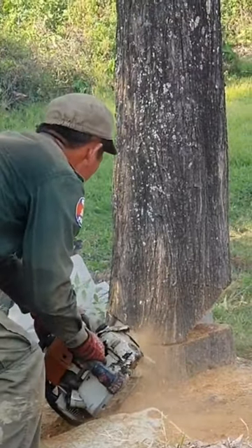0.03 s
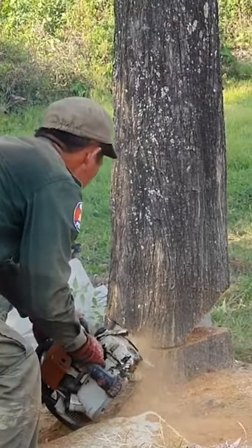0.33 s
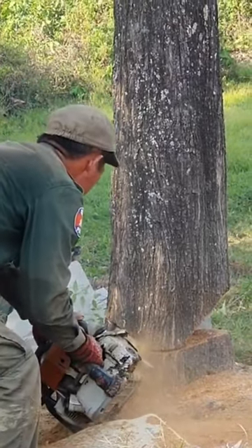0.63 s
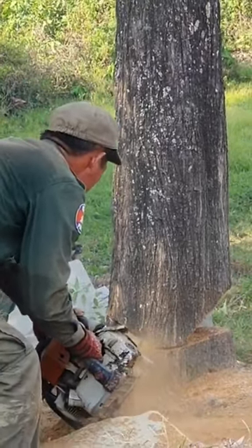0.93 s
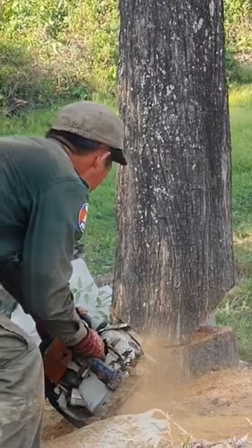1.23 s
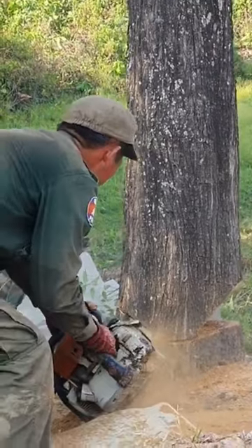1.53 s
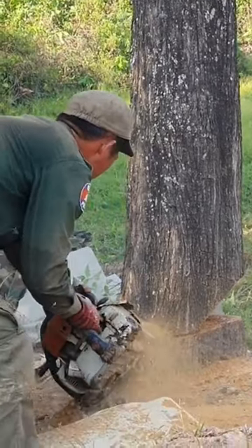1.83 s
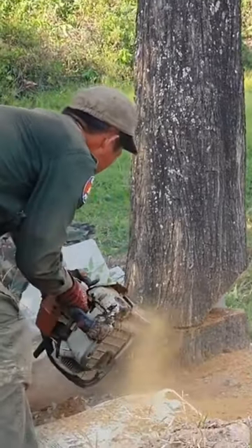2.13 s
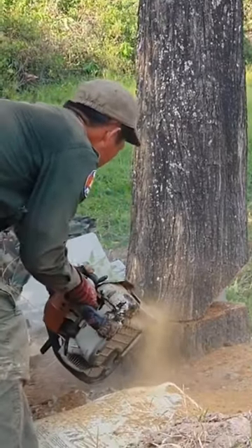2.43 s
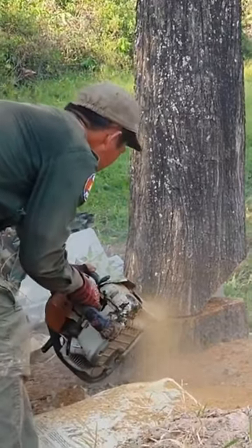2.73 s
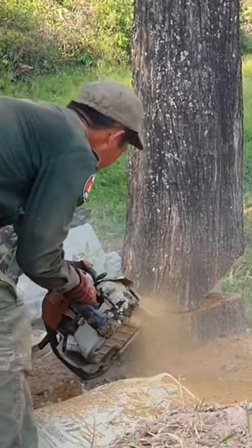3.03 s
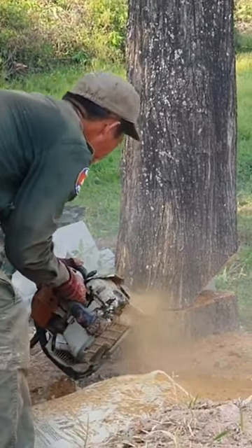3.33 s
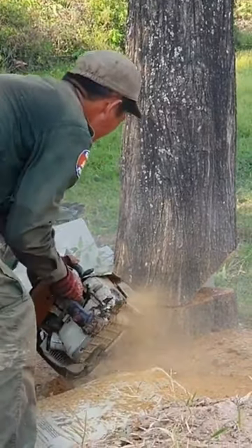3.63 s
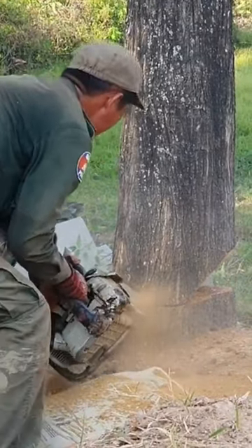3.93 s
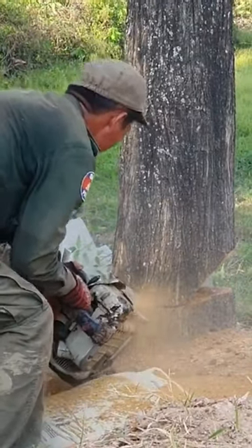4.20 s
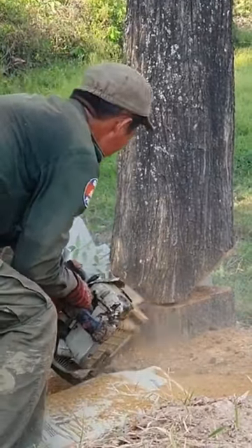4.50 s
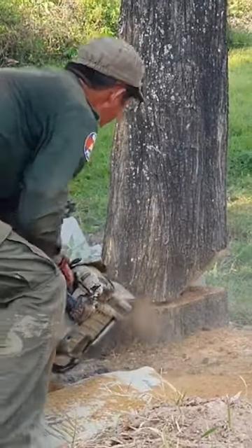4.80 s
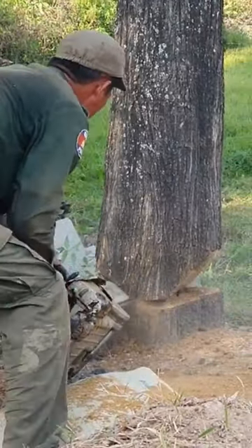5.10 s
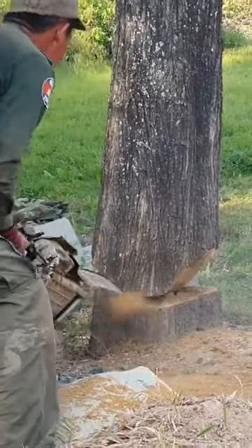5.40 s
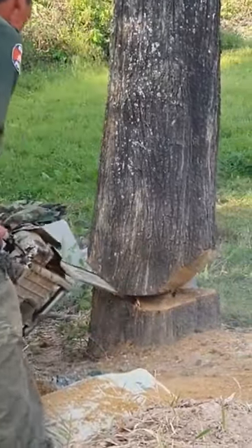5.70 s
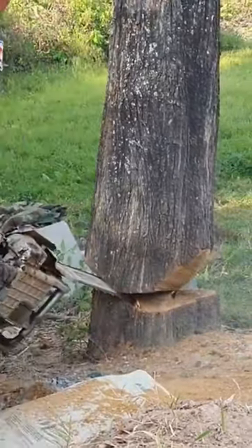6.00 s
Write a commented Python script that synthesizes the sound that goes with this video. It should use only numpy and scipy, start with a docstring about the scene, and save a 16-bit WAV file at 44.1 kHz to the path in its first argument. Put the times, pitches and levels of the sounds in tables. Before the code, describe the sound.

A chainsaw roars steadily under load in a tree trunk, its engine mixed with rasping wood and a metallic whine. It sputters and sags twice, recovering each time, then revs up briefly and winds down. A short scrape follows as the blade leaves the wood, and the saw ticks and rattles at idle. It is heard from a few steps away, stronger on the right, with a faint echo from surrounding trees.

```python
"""Outdoors among trees, a few steps away, a two-stroke chainsaw cuts through a trunk.
Each turn of the engine sends a puff through the muffler; the puffs merge into a snarl and ring the steel,
while the chain hisses and tears out chips. Twice the engine stumbles and picks up again as the saw is
shifted in the cut. Then the throttle closes, the bar (the blade that carries the chain) scrapes out of
the cut and the engine runs down to a puttering idle with a jingling chain."""
import sys
import numpy as np
from scipy import signal
from scipy.fft import rfft, irfft, next_fast_len
from scipy.io import wavfile
from scipy.ndimage import uniform_filter1d, map_coordinates

SR = 44100
rng = np.random.default_rng(int(sys.argv[2]) if len(sys.argv) > 2 else 0)


def transcribe(u):
    """Save the signal u as a 16-bit wav file named by the first command-line argument.

    u: samples, shape (n,) or (channels, n), limited to [-1, 1]; the rate is SR.
    q: integer samples, one column per channel.
    """
    v = np.clip(np.atleast_2d(u).T, -1, 1)
    q = np.round(v * 32767).astype(np.int16)
    wavfile.write(sys.argv[1], SR, q)


N = 271215
TIME_S = np.arange(N) / SR
TUNED_HZ = 128.6  # the engine speed at which the muffler booms loudest under load
BRAKE_AT_S, BRAKE_S = 5.49, .035  # the bar drags out of the cut and brakes the engine
SCRAPE_AT_S, SCRAPE_S, SCRAPE_DB = 5.522, 0.081, 8.3  # the scrape it makes on the way out


def amp(db):
    """Turn decibels into a number to multiply by."""
    return 10 ** (np.asarray(db) / 20)


def unit(x):
    """Scale a sound to an average (rms) level of 1."""
    return x / np.sqrt(np.mean(x ** 2) + 1e-20)


def steady(x, size=3500):
    """Hold the running level near 1; single beats keep their shape."""
    power = uniform_filter1d(uniform_filter1d(x ** 2, size), size // 2)
    return x / np.sqrt(np.abs(power) + 1e-6 * np.mean(x ** 2))


def along(points, hz):
    """Read values between (pitch_hz, value) points, on a log pitch scale."""
    pitches, values = np.transpose(points)
    return np.interp(np.log(hz + 1), np.log(pitches + 1), values)


def curve(points):
    """Join (time_s, value) points with straight lines."""
    return np.interp(TIME_S, *np.transpose(points))


def blend(a, b, share):
    """Fade from a to b as share goes from 0 to 1."""
    return a + (b - a) * np.clip(share, 0, 1)


def after(middle_s, length_s):
    """A ramp from 0 to 1, halfway up at middle_s."""
    return np.clip((TIME_S - middle_s) / length_s + .5, 0, 1)


def since(start_s):
    """Seconds gone by since start_s; zero before it."""
    return np.maximum(TIME_S - start_s, 0)


def swell(middle_s, length_s, height):
    """A smooth bump that stays above half its height for length_s."""
    return height * np.exp(-np.log(2) * np.minimum((2 * (TIME_S - middle_s) / length_s) ** 2, 20))


def swells(rows):
    """Add up one bump for each row."""
    return sum(swell(*row) for row in rows)


def wobble(rate):
    """A smooth curve through rate random values a second."""
    knots = rng.standard_normal(int(N * rate / SR) + 4)
    fine = np.arange(0, len(knots) - 1, 1 / 8)
    return np.interp(np.arange(N) * rate / SR, fine, map_coordinates(knots, [fine]))


def hiss():
    """Two unrelated noises: one for the direct path, one for the scattered paths."""
    return rng.standard_normal((2, N))


def pulses(at, sizes):
    """Clicks at positions counted in samples, even between two samples."""
    index = np.floor(at).astype(int)[:, None] + np.arange(-7, 9)
    offset = index - at[:, None]
    shape = np.sinc(offset) * np.cos(np.pi * offset / 16) ** 2
    return np.bincount(np.clip(index, 0, N).ravel(), (sizes[:, None] * shape).ravel(), N + 1)[:N]


def strikes(rows):
    """One click for each (start_s, level_db) row."""
    start_s, level_db = np.transpose(rows)
    return pulses(start_s * SR, amp(level_db))


def puffs(clicks, rise_s, fall_s):
    """Each click becomes a quick swell of about its own height that dies away."""
    t = np.arange(SR // 20) / SR
    shape = (1 - np.exp(-t / rise_s)) * np.exp(-t / fall_s)
    return np.abs(signal.oaconvolve(clicks, shape / shape.max())[:N])


def filtered(x, response):
    """Scale and shift each frequency of a sound by response(hz)."""
    size = 2 * next_fast_len((N + SR // 4) // 2)
    return irfft(rfft(x, size) * response(np.fft.rfftfreq(size, 1 / SR)), size)[..., :N]


def coloured(x, spectrum, size=4096):
    """Give a sound the tone colour drawn by (pitch_hz, level_db) points."""
    gains = amp(along(spectrum, np.fft.rfftfreq(size, 1 / SR)))
    cepstrum = irfft(np.log(gains + 1e-6))
    # folding makes the filter ring only after a click, never before it
    cepstrum[1:size // 2] *= 2
    cepstrum[size // 2 + 1:] = 0
    ring = irfft(np.exp(rfft(cepstrum)))
    return signal.oaconvolve(x, np.array(ring, ndmin=x.ndim), axes=-1)[..., :N]


def resonate(x, modes):
    """Ring a set of (pitch_hz, width_hz, level_db) tones; narrow ones ring longer."""
    def response(hz):
        return sum((-1) ** k * amp(db) * 1j * hz * width / (pitch ** 2 - hz ** 2 + 1j * hz * width)
                   for k, (pitch, width, db) in enumerate(modes))
    return filtered(x, response)


def wandering(x, hz, width_hz):
    """Ring one tone whose pitch changes with time."""
    carrier = np.exp(2j * np.pi * np.cumsum(hz) / SR)
    keep = np.exp(-np.pi * width_hz / SR)
    return 2 * np.real(carrier * signal.lfilter([1 - keep], [1, -keep], x * carrier.conj()))


def scattered(x, fade_s):
    """Spread a sound over a short tail of echoes that falls at 60 dB per fade_s."""
    t = np.arange(SR // 4) / SR
    tail = rng.standard_normal(len(t)) * amp(-60 * t / fade_s)
    return signal.oaconvolve(x, tail / np.linalg.norm(tail))[:N]


def tree_echo(saw, level_db=-19):
    """The surrounding trees answer faintly, left and right."""
    return amp(level_db) * np.array([scattered(saw, fade_s=0.42), scattered(saw, fade_s=0.62)])


# How much quieter the shaded left side is: pitch_hz, drop_db
LEFT_SHADE = [(40, 8), (110, 11), (400, 11), (700, 10.5), (1300, 9), (2400, 7), (6000, 6.5), (10000, 4.3),
              (15000, 4.2)]
# How far the wave on the left runs ahead: pitch_hz, lead_radians
LEFT_LEAD = [(30, 0), (130, 1.2), (400, 1.7), (1200, 1.5), (2800, 1.5), (4800, 2.8), (8000, 4.3),
             (15000, 8.3)]
# How much sound reaches the left directly: pitch_hz, share (0 to 1)
LEFT_DIRECT = [(40, .4), (120, .98), (600, .97), (1400, .87), (3000, .68), (5000, .56), (7000, .55),
               (12000, .3)]


def left_and_right(note, noise):
    """The left side is shaded: its sound is weaker and shifted, and its treble is mostly scattered."""
    shade = lambda hz: amp(-along(LEFT_SHADE, hz))
    direct = lambda hz: along(LEFT_DIRECT, hz)
    straight = lambda hz: shade(hz) * direct(hz) * np.exp(1j * along(LEFT_LEAD, hz))
    diffuse = lambda hz: shade(hz) * np.sqrt(1 - direct(hz) ** 2)
    centre = lambda hz: np.hypot(np.abs(1 + straight(hz)), diffuse(hz)) / 2
    sway = 1.1 * wobble(2.5)  # the scattered paths change as the saw moves
    reflected = np.cos(sway) * scattered(note, 0.092) + np.sin(sway) * scattered(note, 0.062)
    paths = np.array([note + noise[0], reflected + noise[1]])
    right, stray = filtered(paths, lambda hz: 1 / centre(hz))
    left = filtered(right, straight) + filtered(stray, diffuse)
    # the shade deepens as the saw is drawn out of the cut
    return np.array([left * amp(-3 * after(5.0, 0.7)), right])


# The throttle closing: time_s, opening (0 to 1)
THROTTLE = [(4.828, 0.9), (4.872, 0.1)]


def throttle():
    """How far open the throttle is at each moment."""
    return curve(THROTTLE)


# The engine's two stumbles: time_s, misfiring (0 to 1)
STUMBLES = [(1.835, 0), (1.85, 0.8), (1.95, 0.4), (1.98, 0.16), (2.13, 0), (2.25, 0), (3.84, 0),
            (3.865, 0.7), (3.91, 0.85), (3.96, 0.04)]


def misfiring():
    """How badly the engine misfires at each moment."""
    return curve(STUMBLES)


# The change from running to idling: time_s, clatter_share (0 to 1)
IDLING = [(4.9, 0), (5.6, 0.92)]


def idle_share():
    """How far the rush of the saw has given way to idle clatter."""
    return curve(IDLING)


# Engine speed until the clutch lets go: time_s, turns_per_s
ENGINE_SPEED = [(0.0, 121.2), (0.12, 122.5), (0.33, 130.5), (0.47, 130.1), (0.7, 125.7), (0.93, 127.8),
                (1.69, 127.5), (1.84, 126.5), (1.96, 109.2), (2.08, 105.3), (2.16, 104.4), (2.4, 123.9),
                (2.8, 127.6), (3.19, 127.4), (3.33, 130.9), (3.82, 134.9), (3.86, 132.0), (3.94, 120.3),
                (4.5, 127.1), (4.76, 144.4), (4.85, 147.8), (4.91, 134.4), (4.976, 126.3), (5.07, 117.9),
                (5.2, 105.8), (5.41, 91.8), (5.46, 88.9)]


def engine_speed(waver=0.002796, braked_share=.59, settle_s=.3, idle_hz=23):
    """Turns per second: wavering as the teeth catch, then braked sharply and settling slowly to idle."""
    braked = braked_share * np.exp(-since(BRAKE_AT_S) / BRAKE_S)
    settling = (1 - braked_share) * np.exp(-since(BRAKE_AT_S) / settle_s)
    running = curve(ENGINE_SPEED) * (1 + waver * wobble(22))
    return blend(idle_hz, running, braked + settling)


def engine_strokes(speed, idle_beat_s=5.9885, misfire_db=15, intake_turn=0.38):
    """One exhaust click and one intake click a turn; a stumbling engine misses every other firing."""
    turns = np.cumsum(speed) / SR
    turns = turns - turns[round(idle_beat_s * SR)]  # one stroke lands on this moment
    beats = np.arange(np.ceil(turns[0]), turns[-1])
    at = np.interp(beats, turns, np.arange(N))
    stumble = misfiring()[at.astype(int)]
    shut = 1 - throttle()[at.astype(int)]
    idling = at > (BRAKE_AT_S + BRAKE_S) * SR
    late, strong, uneven = rng.standard_normal((len(beats), 3)).T
    level_db = -0.7 * strong + 0.5 * shut * uneven
    level_db -= stumble * (2.5 * np.abs(uneven) + misfire_db * (beats % 2))
    jitter_s = .00002 + .00003 * shut + .00016 * stumble + .0006 * idling
    firing = pulses(at + SR * late * jitter_s, amp(level_db))
    intake_at = np.interp(beats[:-1] + intake_turn, turns, np.arange(N))
    return firing, pulses(intake_at, amp(2 * uneven[:-1]))


def intake_gulps(intake, level_db=-43, fade_db_per_s=20, ring_hz=975, glide=0.34, glide_s=0.003):
    """Once the engine is slow, each gulp of air rings a short note that rises as the port closes."""
    t = np.arange(SR // 16) / SR
    cycles = np.cumsum(ring_hz * (1 - glide * np.exp(-t / glide_s))) / SR
    gulp = np.sin(2 * np.pi * cycles) * (1 - np.exp(-t / 0.0036)) * np.exp(-t / 0.0072)
    notes = signal.oaconvolve(intake, gulp)[:N]
    return after(BRAKE_AT_S, 0.06) * amp(level_db - fade_db_per_s * since(BRAKE_AT_S)) * steady(notes)


def intake_hoot(speed, pipe_hz=958, width_hz=70, level_db=-31.5, odd_db=-4, db_per_octave=3):
    """As the engine slows, its overtones swell in turn at the intake's own pitch, the even ones most."""
    turns = np.cumsum(speed) / SR
    note = np.zeros(N)
    for k in range(7, 12):
        off_pitch = 2 * (k * speed - pipe_hz) / width_hz
        note += amp(odd_db * (k % 2)) * np.sin(2 * np.pi * k * turns) / np.hypot(1, off_pitch)
    shut_s = THROTTLE[1][0]
    coasting = after(shut_s, 0.03) * (1 - after(BRAKE_AT_S, 0.06))
    return coasting * amp(level_db + db_per_octave * np.log2(speed / TUNED_HZ) + 1.4 * wobble(30)) * note


# Tone colour of an idle tick: pitch_hz, level_db
TICK_COLOUR = [(1500, -22), (4000, 0), (7000, 1), (8200, -6), (10500, 1), (15000, -7)]


def idle_ticks(firing, level_db=-37, fade_db_per_s=9, from_s=5.64):
    """Each idle stroke spits a short bright tick, softer as the engine settles."""
    force = after(from_s, 0.06) * amp(2 * wobble(30) - fade_db_per_s * since(from_s))
    bursts = puffs(firing * force, rise_s=0.0009, fall_s=0.0064)
    return amp(level_db) * bursts * unit(coloured(hiss(), TICK_COLOUR))


# Tone colour of the clattering engine case: pitch_hz, level_db
CLATTER_COLOUR = [(40, -47), (240, -24), (400, -15), (1000, -12), (1900, -16), (2400, -7.5), (2770, 1.5),
                  (3100, -8), (3650, -5), (4050, -2), (4400, -5), (4800, -0.5), (5150, -5), (5500, 0),
                  (5850, -6.5), (6850, -1.5), (7900, -16), (10000, -16)]


def clutch_knocks(firing, level_db=-36, fade_db_per_s=24, from_s=4.4):
    """The clutch knocks unevenly with the strokes, ever more softly."""
    loose = after(from_s, 0.083) * amp(-fade_db_per_s * since(from_s))
    bursts = puffs(firing * loose * amp(wobble(30)), rise_s=.004, fall_s=0.0046)
    return amp(level_db) * bursts * unit(coloured(hiss(), CLATTER_COLOUR))


# Hard firings at idle: start_s, relative_thump_db, relative_knock_db, tick_db
IDLE_KICKS = [(5.79, -46, -28, -42), (5.8215, -44, -24.5, -46), (5.854, -44, -36, -36),
              (5.886, -46, -31, -37), (5.92, -46, -29, -46), (5.992, -39, -30, -38), (6.025, -48, -33, -46),
              (6.103, -37, -43, -55)]


def idle_kicks(thump_hz=385, thump_s=0.006, thump_gain_db=-4, knock_gain_db=-3):
    """A hard firing at idle thumps the muffler, knocks the case and spits a tick."""
    start_s, thump_db, knock_db, tick_db = np.transpose(IDLE_KICKS)
    t = np.arange(SR // 16) / SR
    ring = np.sin(2 * np.pi * thump_hz * t) * np.exp(-t / thump_s)
    thumps = signal.oaconvolve(pulses(start_s * SR, amp(thump_db + thump_gain_db)), ring)[:N]

    def burst(level_db, colour):
        clicks = pulses(start_s * SR, amp(level_db))
        return puffs(clicks, rise_s=.001, fall_s=0.0055) * unit(coloured(hiss(), colour))
    return thumps, burst(knock_db + knock_gain_db, CLATTER_COLOUR) + burst(tick_db, TICK_COLOUR)


# The slack chain hits the bar: start_s, relative_level_db
CHAIN_HITS = [(5.718, -27), (5.758, -29), (5.783, -29), (5.836, -25), (5.883, -31), (5.919, -33),
              (5.98, -32), (6.021, -30), (6.06, -30), (6.088, -26), (6.104, -27)]
# Tones of the struck bar: pitch_hz, width_hz, level_db
STRUCK_BAR_TONES = [(2770, 90, -10), (4070, 69, -13), (5510, 200, -19), (6810, 75, 7)]


def chain_jingle(gain_db=-7.5):
    """At idle, links of the slack chain shiver against the ringing bar."""
    hits = puffs(strikes(CHAIN_HITS), rise_s=0.00086, fall_s=0.02)
    return amp(gain_db) * hits * unit(resonate(hiss(), STRUCK_BAR_TONES))


# Tones of the bar when free of the wood: pitch_hz, width_hz, level_db
FREE_BAR_TONES = [(2120, 63, -8), (2800, 110, -1.5), (3410, 77, -5), (4850, 82, 0.5)]


def coasting_ring(firing, speed, level_db=-31.5, db_per_octave=11):
    """With the throttle shut the loose chain rings the bar, more softly as it slows."""
    shaken = firing + 0.11 * puffs(firing, rise_s=0.00069, fall_s=0.0053) * rng.standard_normal(N)
    gain = (1 - throttle()) * amp(level_db + db_per_octave * np.log2(speed / TUNED_HZ))
    return gain * steady(resonate(shaken, FREE_BAR_TONES))


# Tones of the squealing bar: pitch_hz, width_hz, level_db
SQUEAL_TONES = [(1740, 34, -2), (3250, 60, -6)]


def bar_squeal(level_db=-41):
    """The bar squeals on the edge of the cut as it leaves."""
    squeal = unit(resonate(rng.standard_normal(N), SQUEAL_TONES))
    return swell(SCRAPE_AT_S, SCRAPE_S, amp(level_db)) * squeal


# Ways the saw is held (entering, sinking, deep, bogged down, raised, twisted, lowered), with base levels:
# move_middle_s, move_length_s, boom_db, bark_db, snarl_db, rasp_db, hardness_db, lowest_steel_db
# Boom, bark and snarl are the low, middle and high exhaust; hardness is how sharply the strokes hit.
STANCES = [(0, 0, -27.5, -29.5, -28.5, -20, 5.5, -43.5), (0.59, 0.24, -28, -29.8, -26.8, -19.5, 4, -42),
           (0.97, 0.3, -28.5, -29, -29, -20, 4, -45), (1.95, 0.072, -30, -29.5, -30.5, -21, 9, -38),
           (2.22, 0.29, -31, -28, -30, -21.5, 10.5, -36), (3.31, 0.19, -31, -28.5, -26, -21, 7, -37),
           (3.9, 0.08, -29, -29, -28.5, -21, 5.5, -39.5)]


def stance_levels():
    """The six levels hold while the saw stays put and glide as it moves to the next stance."""
    levels = np.array(STANCES[0][2:])[:, None]
    for middle_s, length_s, *row in STANCES[1:]:
        levels = blend(levels, np.array(row)[:, None], after(middle_s, length_s))
    return levels


# Tones of the steel muffler and bar: pitch_hz, width_hz, level_db
STEEL_TONES = [(2173, 84, 0), (2740, 196, -0.5), (3325, 70, 2), (3840, 140, -4.5), (4840, 110, -0.5),
               (5850, 215, 1), (6374, 150, 2)]
# The bar is pinched in the cut: middle_s, length_s, boost_db
PINCHES = [(0.26, 0.07, 15), (2.26, 0.25, 6.5), (3.68, 0.13, 9), (4.17, 0.16, 12.5), (4.822, 0.052, 12)]


def steel_whine(firing, force_db, lowest_db, upper_db=-8, drift_db=1.5, detune=0.012):
    """Strokes ring the steel into a buzz that wanders with pressure; a pinch brings out its low tone."""
    strokes = firing * amp(1.9 * wobble(100))
    strokes += 0.028 * puffs(firing, rise_s=0.00017, fall_s=0.0014) * rng.standard_normal(N)
    tones = []
    for pitch_hz, width_hz, level_db in STEEL_TONES:
        tone = wandering(strokes, pitch_hz * (1 + detune * wobble(7)), width_hz)
        tones.append(tone * amp(level_db + drift_db * wobble(8.7)))
    buzz = amp(force_db + upper_db) * steady(sum(tones[1:]))
    singing = amp(lowest_db + swells(PINCHES)) * steady(tones[0])
    return throttle() * (buzz + singing)


# The teeth bite deeper and throw more chips, or ease off: middle_s, length_s, change_db
BITES = [(0.162, 0.083, 1), (0.575, 0.065, 1), (0.72, 0.075, 1), (1.2, 0.26, 1), (1.778, 0.074, 0.5),
         (2.03, 0.065, 2), (2.27, 0.081, 2.2), (2.59, 0.07, 2.8), (3.63, 0.08, 1), (4.05, 0.12, 1),
         (2.75, 0.079, -0.5), (3.8, 0.088, -1)]


def chain_levels(speed, loaded_rasp_db, db_per_octave=13.5, stumble_db=-4):
    """Rasp and fizz in dB: they swell with each bite, then sink to idle as the free chain slows."""
    load_change_db = swells(BITES) + stumble_db * misfiring()
    slowing_db = db_per_octave * np.log2(speed / TUNED_HZ)
    scrape_db = swell(SCRAPE_AT_S, SCRAPE_S, SCRAPE_DB)

    def level(loaded_db, coast_db, idle_db):
        free_db = 20 * np.log10(np.hypot(amp(coast_db + slowing_db), amp(idle_db)))
        return blend(free_db + scrape_db, loaded_db + load_change_db, throttle())
    rasp_db = level(loaded_rasp_db, coast_db=-27.5, idle_db=-41)
    fizz_db = level(loaded_db=-27, coast_db=-38, idle_db=-51)
    return rasp_db, fizz_db


# Tone colour of the chain's bright fizz: pitch_hz, level_db
FIZZ_COLOUR = [(5500, -32), (8000, 0), (9300, -4), (10800, 0), (12300, 2), (14000, -1.5), (15500, -3.5)]
# Tone colour of the wood being cut: pitch_hz, level_db
WOOD_COLOUR = [(25, -36), (90, -22), (220, -12.5), (400, -5.5), (600, 3.5), (1000, 0.5), (1500, 8.5),
               (1900, 4), (2600, -4), (4000, -26)]


def cutting(firing, rasp_db, fizz_db, chips_per_s=1500, chip_db=-8, wood_db=-15):
    """The chain fizzes and crackles as it tears out chips, over a dull rush that eases at idle."""
    chips = (rng.random(N) < chips_per_s / SR) * hiss()
    pulsing = 1 + 0.38 * puffs(firing, rise_s=0.00081, fall_s=0.008)
    spray = (hiss() + amp(chip_db) * unit(chips)) * pulsing
    fizz = amp(fizz_db + 1.13 * wobble(45)) * steady(coloured(spray, FIZZ_COLOUR))
    wood = amp(rasp_db + wood_db + 1.4 * wobble(33)) * unit(coloured(hiss(), WOOD_COLOUR))
    return fizz + blend(1, .5, idle_share()) * wood


# Tone colour of the rasp early in the cut: pitch_hz, level_db
EARLY_RASP_COLOUR = [(1200, -36.5), (2000, -11.5), (2450, -10), (2800, -5.5), (3050, -3.5), (3300, -6.5),
                     (3700, -6), (4500, -5.5), (4900, -4), (5300, -2), (6400, -1), (7300, -5), (8200, -21),
                     (10000, -20)]
# Tone colour of the rasp once the saw is deep: pitch_hz, level_db
DEEP_RASP_COLOUR = [(1800, -29), (2150, -4.5), (2430, -10), (2760, -1.5), (3050, -5), (3320, -3.5),
                    (3550, -5), (3850, -4), (4450, -6.5), (4850, -1.5), (5300, -1.5), (5800, 0),
                    (6400, -0.8), (7300, -3.5), (8200, -16), (10000, -33)]


def rasp(firing, rasp_db, hardness_db):
    """Each exhaust stroke adds a burst of hiss to the chain's rush; at idle the case clatters instead."""
    bursts = puffs(firing, rise_s=0.00014, fall_s=0.00035) * amp(hardness_db - 5.5 * wobble(90))
    jet = (1 + 0.15 * bursts) * hiss()
    deep = after(*STANCES[2][:2])
    running = blend(unit(coloured(jet, EARLY_RASP_COLOUR)), unit(coloured(jet, DEEP_RASP_COLOUR)), deep)
    rattle = (1 + 0.29 * puffs(firing, rise_s=.002, fall_s=0.0059)) * hiss()
    sound = blend(running, unit(coloured(rattle, CLATTER_COLOUR)), idle_share())
    return amp(rasp_db + 0.97 * wobble(45)) * steady(sound)


def shifting_colour(x, depth_db, size=1024):
    """Narrow patches of the hiss grow louder and softer as the saw moves."""
    spectra = signal.stft(x, nperseg=size)[2]
    patches = rng.standard_normal(spectra.shape[1:])
    patches = uniform_filter1d(patches, size=4, axis=0)  # smooth across pitch
    patches = uniform_filter1d(patches, size=12, axis=1)  # smooth across time
    shifted = signal.istft(spectra * amp(depth_db * unit(patches)), nperseg=size)[1][:, :N]
    return unit(shifted) * np.std(x)


# Unburnt fuel goes off with a bang: start_s, relative_level_db
POPS = [(1.8637, -13), (1.9244, -11), (1.9494, -27.5), (3.8664, -6.5), (3.89, -7), (3.9135, -9),
        (3.931, -15), (3.965, -16), (4.846, -13)]
# Tone colour of a pop: pitch_hz, level_db
POP_COLOUR = [(250, -14.5), (800, 0), (1500, -4), (3300, 2.5), (4500, -1), (6500, -1), (8500, -7),
              (15000, -13)]


def muffler_pops(gain_db=-8):
    """Unburnt fuel spits from the muffler as the engine stumbles and as the throttle shuts."""
    bursts = puffs(strikes(POPS), rise_s=0.00091, fall_s=0.0038)
    return amp(gain_db) * bursts * unit(coloured(hiss(), POP_COLOUR))


def trunk_bounce(x, delay_s=0.002676, share=0.56):
    """Sound bounces between saw and trunk: it spreads in time but keeps its colour."""
    echo = lambda hz: np.exp(-2j * np.pi * hz * delay_s)
    return filtered(x, lambda hz: (share + echo(hz)) / (1 + share * echo(hz)) / echo(hz))


# The snarl swells and dips with the pressure on the saw: middle_s, length_s, change_db
SNARL_SWELLS = [(0.17, 0.099, 3.5), (0.7, 0.095, 1.5), (1.78, 0.08, 2), (2.01, 0.056, 3),
                (3.76, 0.18, -5.5), (4.22, 0.1, 2), (4.6, 0.33, 2)]


def exhaust_levels(speed, boom_db, bark_db, snarl_db):
    """Low, middle and high exhaust in dB: full under load, falling with speed once the throttle shuts."""
    opening, stumble = throttle(), misfiring()
    octaves = np.log2(speed / TUNED_HZ)
    twist_db = swell(3.4, 0.23, 5.3)  # twisting the saw briefly trades boom for snarl
    # under load
    boom_db = boom_db - twist_db - 6.5 * stumble
    bark_db = bark_db - 0.48 * twist_db + 4 * octaves
    snarl_db = snarl_db + 0.35 * twist_db + 0.48 * swells(BITES) - 3 * stumble + swells(SNARL_SWELLS)
    # fade to the coasting levels as the throttle shuts
    scrape_db = swell(SCRAPE_AT_S, SCRAPE_S, SCRAPE_DB)
    boom_db = blend(-41, boom_db, opening)
    bark_db = blend(-41.5 + 7.5 * octaves + 0.47 * scrape_db, bark_db, opening)
    snarl_db = blend(-36 + 10 * octaves, snarl_db, opening)
    # the boom follows the muffler's tuning until the strokes are slow enough to ring it one by one
    tuned_hz, width_hz = blend(129.5, TUNED_HZ, opening), blend(5.9, 8.4, opening)
    off_tune_db = -10 * np.log10(1 + ((speed - tuned_hz) / width_hz) ** 2)
    boom_db = blend(boom_db + off_tune_db, -49, after(5.4, 0.22))
    return boom_db, bark_db, snarl_db


# Tone colour of the muffler in each stance of the saw: pitch_hz, level_db
ENTERING_COLOUR = [(60, -16), (128, -13), (250, -23), (380, 1.5), (515, -8.5), (640, -3), (765, 2.5),
                   (890, -15.5), (1015, 8.5), (1160, -14.5), (1290, -3), (1460, 12), (1560, 0.5),
                   (1700, -19), (1830, 1.5), (1960, -10), (3400, -56)]
SINKING_COLOUR = [(60, -21), (128, -13), (254, -25.5), (380, -0.5), (508, -11), (635, -4), (762, 2.5),
                  (890, -23), (1015, -2.5), (1143, -15), (1270, -7), (1397, -6.5), (1520, 3), (1650, -16.5),
                  (1780, -14), (1900, -10.5), (3400, -63)]
DEEP_COLOUR = [(60, -24), (128, -13.5), (250, -24), (383, -3), (510, -9), (640, 1.5), (766, 9), (895, -18),
               (1020, 2.5), (1150, -6.5), (1280, -2), (1410, -5.5), (1540, -4.5), (1660, -2.5), (1790, -3),
               (1930, -25), (2250, -9), (3400, -58)]
BOGGED_COLOUR = [(60, -38), (105, -2), (210, -18), (260, -28), (315, -3.5), (420, 1), (500, -2), (630, 2),
                 (740, 4.5), (850, 0), (950, 6), (1090, -17), (1270, 3), (1370, 2), (1480, 12.5),
                 (1680, -23), (2100, -9), (3400, -58)]
RAISED_COLOUR = [(60, -38), (125, -7.5), (250, -12.5), (375, 4), (500, -16.5), (630, 5.5), (760, 7.5),
                 (880, -0.5), (1010, 2.5), (1130, -17.5), (1260, 7.5), (1400, -6.5), (1510, 5), (1650, -23),
                 (1780, 5), (2100, -14.5), (3400, -57)]
TWISTED_COLOUR = [(60, -65), (130, -4), (265, -18), (400, 2.5), (530, -8), (660, -11.5), (800, 3),
                  (1070, -9.5), (1320, 5), (1460, 7), (1700, -10), (2000, 1), (2140, 7), (2500, -7),
                  (3400, -32)]
LOWERED_COLOUR = [(60, -54), (118, -2.5), (148, -1), (255, -15), (370, 9), (420, 5.5), (500, -5.5),
                  (620, -9), (745, 1), (870, -8.5), (1000, 4.5), (1150, -15), (1380, -4), (1490, -2),
                  (1700, -41), (2150, -16.5), (3400, -45)]
# Tones of the muffler with the throttle shut: pitch_hz, width_hz, level_db
MUFFLER_TONES = [(132, 92, -10.5), (375.3, 25.4, 7), (682, 94, 7), (987, 53, 1), (1385, 100, -6.5),
                 (1796, 26, -12), (2150, 190, -17)]


def exhaust(firing, boom_db, bark_db, snarl_db, low_hz=490, high_hz=1170):
    """Puffs of gas leave the muffler; trunk and ground colour them anew with each stance of the saw."""
    roughness = 0.011 * blend(1.6, 0.95, throttle())
    gas = firing + roughness * puffs(firing, rise_s=0.00023, fall_s=0.0024) * rng.standard_normal(N)
    loaded = unit(coloured(gas, ENTERING_COLOUR))
    colours = SINKING_COLOUR, DEEP_COLOUR, BOGGED_COLOUR, RAISED_COLOUR, TWISTED_COLOUR, LOWERED_COLOUR
    for colour, (middle_s, length_s, *_) in zip(colours, STANCES[1:]):
        loaded = blend(loaded, unit(coloured(gas, colour)), after(middle_s, length_s))
    coasting = unit(resonate(gas, MUFFLER_TONES))
    note = trunk_bounce(blend(coasting, loaded, throttle()))
    # low, middle and high swell separately; the upper two flutter as the teeth catch
    below = lambda edge_hz: filtered(note, lambda hz: 1 / (1 + (hz / edge_hz) ** 16))
    low, low_and_middle = below(low_hz), below(high_hz)
    boom = amp(boom_db) * steady(low)
    bark = amp(bark_db + .5 * wobble(25)) * steady(low_and_middle - low)
    snarl = amp(snarl_db + 1.66 * wobble(25)) * steady(note - low_and_middle)
    return boom + bark + snarl


def scene(coast_hardness_db=-11):
    """Engine, cut and chain, with a faint answer from the surrounding trees."""
    speed = engine_speed()
    firing, intake = engine_strokes(speed)
    *loaded_exhaust_db, loaded_rasp_db, loaded_hardness_db, lowest_steel_db = stance_levels()
    rasp_db, fizz_db = chain_levels(speed, loaded_rasp_db)
    hardness_db = blend(coast_hardness_db, loaded_hardness_db, throttle())
    thumps, knocks = idle_kicks()
    note = steel_whine(firing, rasp_db + hardness_db, lowest_steel_db)
    note += coasting_ring(firing, speed) + bar_squeal()
    note += intake_hoot(speed) + intake_gulps(intake) + thumps
    note -= exhaust(firing, *exhaust_levels(speed, *loaded_exhaust_db))  # its wave goes in upside down
    rush = rasp(firing, rasp_db, hardness_db) + cutting(firing, rasp_db, fizz_db)
    noise = shifting_colour(rush, depth_db=2.5)
    noise += muffler_pops() + chain_jingle() + clutch_knocks(firing) + idle_ticks(firing) + knocks
    return tree_echo(note + noise[0]) + left_and_right(note, noise)


def record(dry, ceiling=.9, top_hz=15550):
    """Round off the highest peaks and remove the treble above top_hz."""
    rounded = dry / (1 + np.abs(dry / ceiling) ** 6) ** (1 / 6)
    return filtered(rounded, lambda hz: hz < top_hz)


dry = scene()
out = record(dry)
transcribe(out)
```